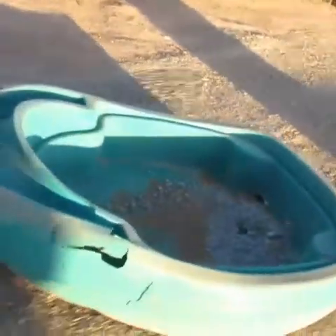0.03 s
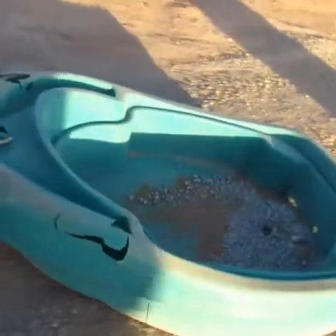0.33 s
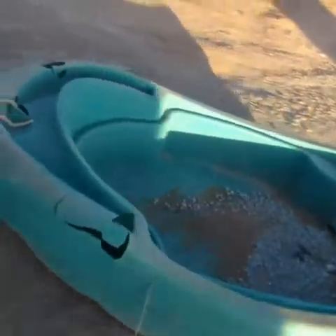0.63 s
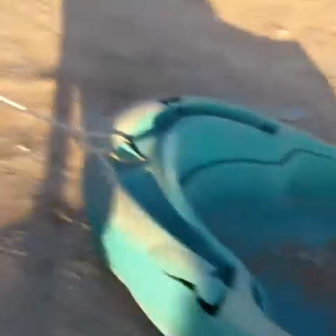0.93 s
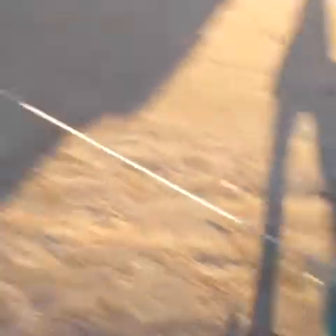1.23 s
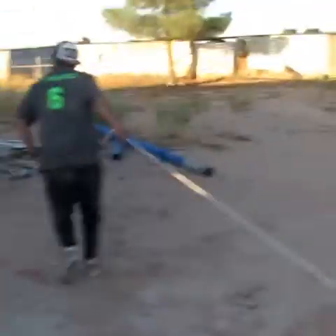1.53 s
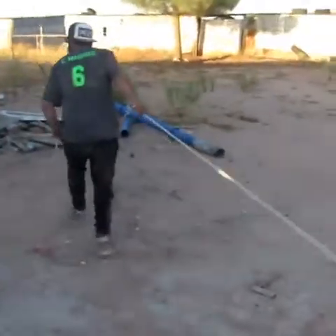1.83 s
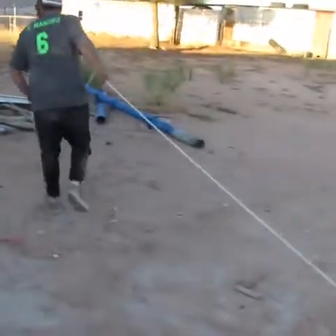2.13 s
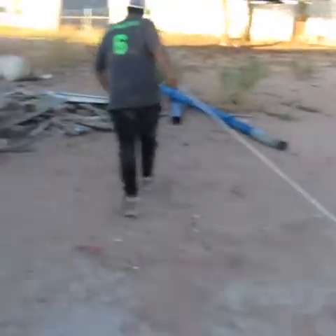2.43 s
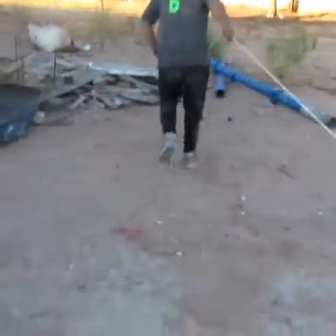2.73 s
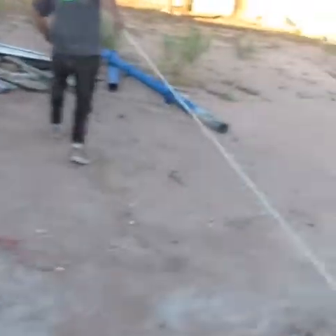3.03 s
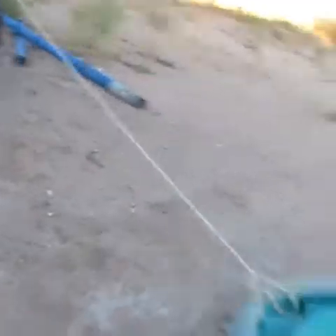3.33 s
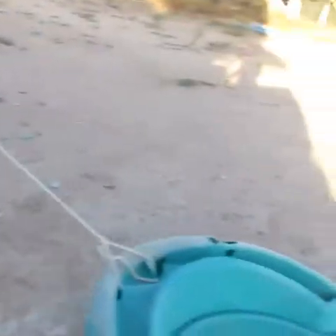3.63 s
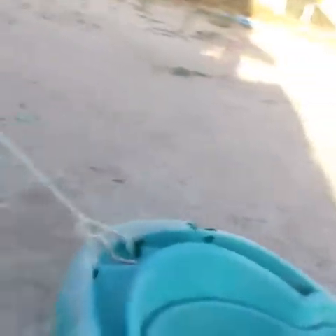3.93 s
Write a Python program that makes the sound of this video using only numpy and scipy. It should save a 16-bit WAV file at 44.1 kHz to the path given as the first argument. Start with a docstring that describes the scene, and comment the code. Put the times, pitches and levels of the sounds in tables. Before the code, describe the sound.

A plastic tub dragged over dirt, rumbling hollowly with gritty scraping and small thumps.

```python
"""Bare dirt, close to the microphone: a plastic tub with some gravel in it is dragged on a rope.
Grit catching under its floor makes the shell rumble and rasp; sand hisses at the rim, gravel crackles.
Now and then a stone ticks on the plastic, a pebble snaps or the tub thumps over a stone.
Light wind stirs at the microphone."""
import sys
import numpy as np
from scipy import signal
from scipy.fft import rfft, irfft
from scipy.io import wavfile
from scipy.ndimage import uniform_filter1d, minimum_filter1d

SR = 44100
rng = np.random.default_rng(int(sys.argv[2]) if len(sys.argv) > 2 else 0)


def pcm_store(signal):
    """Save signal as 16-bit PCM."""
    levels = np.round(np.clip(np.atleast_2d(signal), -1, 1) * 32767)
    wavfile.write(sys.argv[1], SR, levels.astype(np.int16).T)


N = 176400
TIME = np.arange(N) / SR
BIN_HZ = np.fft.rfftfreq(N, 1 / SR)


def amp(db):
    return 10 ** (np.asarray(db) / 20)


def unit_rms(x):
    return x / np.sqrt(np.mean(x ** 2) + 1e-20)


def unit_peak(x):
    return x / abs(x).max()


def highpass(x, hz):
    return signal.sosfilt(signal.butter(4, hz, "high", fs=SR, output="sos"), x)


def curve(points):
    """A (seconds, value) table at every sample."""
    return np.interp(TIME, *np.transpose(points))


def at_hz(points, hz):
    """A (Hz, value) table on a log-frequency axis."""
    points_hz, value = np.transpose(points)
    return np.interp(np.log(hz + 1), np.log(points_hz), value)


def add(mix, start_s, sound):
    part = mix[..., max(round(start_s * SR), 0):][..., :sound.shape[-1]]
    part += sound[..., :part.shape[-1]]


def ring(x, spectrum, size=4096):
    """Passes x through a causal body with the given spectrum."""
    log_gain = np.log(amp(at_hz(spectrum, abs(np.fft.fftfreq(size, 1 / SR)))))
    response = np.fft.ifft(np.exp(signal.hilbert(log_gain).conj())).real[:size // 2]
    return signal.fftconvolve(x, response)[:len(x)]


def decay(x, decay_s):
    """Gives each click an exponential tail."""
    return signal.lfilter([1], [1, -np.exp(-1 / (decay_s * SR))], x)


def wander(slow_hz, fast_hz):
    """Random drift of rms 1 between two rates."""
    shape = BIN_HZ / (BIN_HZ + slow_hz) ** 1.5 / (1 + (BIN_HZ / fast_hz) ** 2)
    return unit_rms(irfft(rfft(rng.standard_normal(N)) * shape, N))


def catches(per_s, spread_db):
    """Grains catching and slipping: random clicks of uneven size."""
    size = amp(spread_db * np.minimum(rng.exponential(1, N), 4))
    return size * rng.choice([-1, 1], N) * (rng.random(N) < per_s / SR)


def stereo(make, apart):
    """Two channels share one sound; apart is the power share each hears alone."""
    return np.sqrt(1 - apart) * make() + np.sqrt(apart) * np.array([make(), make()])


# Shell response. Each row: frequency in Hz, gain in dB.
SHELL_SPECTRUM = [(25, -63), (50, -38.5), (80, -9), (105, -7), (130, 1.5), (165, -2.5), (230, -1.5),
                  (320, -1.5), (390, -6.5), (500, -12.5), (610, -20.5), (690, -34.5), (1000, -47.5),
                  (3000, -82.5)]
# Floor panel modes. Each row: ratio to the main note, weight in dB, decay in seconds.
PANEL_MODES = [(.8, -10, 0.012), (1, 3, 0.011), (1.222, -7.5, 0.012), (1.7, -17.5, 0.02)]
# Rumble envelope. Each row: time in seconds, level in dB.
RUMBLE_DB = [(0, -20), (.25, -21), (.42, -21.5), (.5, -18), (.8, -21), (.95, -18.5), (1.3, -21),
             (1.43, -20.5), (1.56, -19), (1.71, -20), (1.75, -23), (1.92, -17.5), (1.96, -22), (2.06, -16),
             (2.18, -21), (2.31, -20.5), (2.42, -25), (2.47, -20), (2.61, -23), (2.77, -18), (2.95, -24.5),
             (3.02, -21), (3.11, -25.5), (3.28, -21), (3.4, -23.5), (3.48, -21), (3.8, -21.5),
             (3.89, -25.5), (3.94, -24)]


def rumble(panel_hz=270, panel_db=-7, flex=0.043):
    """Dirt lumps knock the floor: the damped shell booms, the panel's hollow notes bend as it flexes."""
    cycles = np.cumsum(panel_hz * (1 + flex * wander(slow_hz=1.6, fast_hz=12))) / SR
    drive = catches(per_s=900, spread_db=1.0)
    modes = 0
    for ratio, weight_db, decay_s in PANEL_MODES:
        phasor = np.exp(2j * np.pi * ratio * cycles)
        modes += amp(weight_db / 2) * (phasor * decay(drive / phasor, decay_s)).real
    hollow = amp(panel_db) * unit_rms(ring(modes, SHELL_SPECTRUM))
    knocks = lambda: unit_rms(ring(catches(per_s=1800, spread_db=1.6), SHELL_SPECTRUM))
    judder_db = 0.31 * wander(slow_hz=9.7, fast_hz=49.7)
    return (stereo(knocks, apart=0.046) + hollow) * amp(curve(RUMBLE_DB) + judder_db - 0.12)


# Gusts as the microphone swings round. Each row: time in seconds, relative level in dB.
GUST_DB = [(0, -32), (1.5, -41), (1.85, -26), (2.0, -35), (2.6, -30), (2.9, -45), (4, -37)]
# Light wind. Each row: frequency in Hz, gain in dB.
WIND_SPECTRUM = [(15, -28), (55, 11), (80, -11), (300, -26), (2000, -45)]


def wind(opposed=0.83):
    """Soft low buffeting pushes on one microphone port as it pulls on the other."""
    puff = lambda: unit_rms(ring(rng.standard_normal(N), WIND_SPECTRUM))
    pair = stereo(puff, apart=1 - opposed) * np.array([[1], [-1]])
    return pair * amp(curve(GUST_DB) + 1.6 * wander(slow_hz=6, fast_hz=18) - 9)


# Floor scrape as the pull comes and goes. Each row: time in seconds, level in dB.
DRAG_DB = [(.02, -34.5), (.07, -33.5), (.34, -32), (.78, -31), (1.0, -28.5), (1.06, -33), (1.09, -29),
           (1.22, -33.5), (1.44, -31), (1.63, -30), (1.66, -28.5), (1.71, -27), (1.73, -36), (1.86, -32),
           (1.98, -32.5), (2.23, -32), (2.28, -37.5), (2.68, -35.5), (2.76, -31.5), (2.92, -34),
           (2.98, -30), (3.03, -35), (3.5, -35.5), (3.73, -36), (3.82, -31), (3.92, -36)]
# Scraping floor. Each row: frequency in Hz, gain in dB.
FLOOR_SPECTRUM = [(200, -40), (600, -16.5), (690, -18), (790, -4.5), (900, 1), (1200, -2.5), (1600, -7),
                  (2400, -16.5), (3300, -28), (6000, -46), (15000, -47)]
# Envelope of rim grit, sand and gravel. Each row: time in seconds, relative level in dB.
GRAIN_DB = [(.02, -48), (.09, -50), (.27, -45), (.35, -50), (.48, -45), (.77, -49), (.99, -43.5),
            (1.06, -47.5), (1.1, -43), (1.15, -51), (1.23, -51.5), (1.37, -52), (1.41, -49), (1.6, -50.5),
            (1.7, -46), (1.73, -54.5), (1.92, -49.5), (1.98, -54.5), (2.23, -49.5), (2.29, -54),
            (2.66, -56), (2.77, -50.5), (2.87, -53), (3.1, -55), (3.4, -52.5), (3.55, -56), (3.67, -51.5),
            (3.74, -55.5), (3.83, -49), (3.92, -55)]
# Coarse grit at the rim. Each row: frequency in Hz, gain in dB.
RIM_SPECTRUM = [(700, -18), (1500, -3.5), (2500, 8.5), (3400, 1), (4500, -3), (8000, -23)]


def scrape(clumps):
    """Grit rasps along the floor in clumps; coarser grains grind at the rim."""
    rasp = lambda: unit_rms(ring(catches(per_s=3800, spread_db=1.0), FLOOR_SPECTRUM))
    grind = unit_rms(ring(catches(per_s=1900, spread_db=-0.5), RIM_SPECTRUM))
    floor = stereo(rasp, apart=0.042) * amp(curve(DRAG_DB) + 1.49 * clumps + 0.01)
    return floor + grind * amp(curve(GRAIN_DB) + 2.4 * clumps + 0.5)


# Loose sand. Each row: frequency in Hz, gain in dB.
SAND_SPECTRUM = [(500, -25), (2000, 6), (3500, -0.5), (5000, 0), (7500, -5), (10000, -9), (12500, -15.5),
                 (14500, -29)]


def sand(clumps, apart_hz=7000):
    """Fine grains hiss and crackle around the rim; the finest differ from port to port."""
    fizz = lambda: unit_rms(ring(catches(per_s=12000, spread_db=2.0), SAND_SPECTRUM))
    apart = 0.69 * BIN_HZ ** 2 / (BIN_HZ ** 2 + apart_hz ** 2)
    shared = np.sqrt(1 - apart) * rfft(fizz())
    separate = np.sqrt(apart) * rfft([fizz(), fizz()])
    return irfft(shared + separate, N) * amp(curve(GRAIN_DB) + 1.2 * clumps + 2.5)


# Crunching gravel. Each row: frequency in Hz, gain in dB.
GRAVEL_SPECTRUM = [(700, -23), (1800, 1), (2700, 13.5), (5000, 1), (8000, -11), (13000, -28)]


def gravel(crush_s=0.0023, offset_db=-4.0, expansion=0.65):
    """Gravel grinds and cracks in short, dry bursts, standing out most while the tub is close."""
    bursts = decay(abs(catches(per_s=130, spread_db=1.0)), crush_s)
    crackle = lambda: unit_rms(ring(bursts * rng.standard_normal(N), GRAVEL_SPECTRUM))
    grain_db = curve(GRAIN_DB)
    level_db = grain_db + expansion * (grain_db - grain_db.mean()) + offset_db
    return stereo(crackle, apart=0.04) * amp(level_db)


# Larger stones on the plastic. Each row: start in seconds, peak level in dB, resonance in Hz.
STONE_TICKS = [(.088, -16, 980), (.131, -24.5, 3200), (.283, -20, 2000), (1.399, -19.5, 1720),
               (2.238, -17, 1150), (2.621, -23.5, 1050), (3.512, -20.5, 1150), (3.551, -18.5, 1480),
               (3.784, -19.5, 960)]


def ticks(low_cut_hz=800, decay_cycles=4, rasp_s=0.004, size=2048):
    """A stone knocks on the plastic: a dry rasp with one broad, dead resonance."""
    out, t = np.zeros(N), np.arange(size) / SR
    for start_s, db, hz in STONE_TICKS:
        note = np.sin(2 * np.pi * hz * t) * np.exp(-t * hz / decay_cycles) * np.tanh(t * hz)
        rasp = ring(rng.standard_normal(size) * np.exp(-t / rasp_s), FLOOR_SPECTRUM)
        tick = highpass(unit_peak(note) + unit_peak(rasp), low_cut_hz)
        add(out, start_s, amp(db) * unit_peak(tick))
    return out


# Pebbles under the rim. Each row: start in seconds, peak level in dB.
PEBBLE_SNAPS = [(.089, -30), (.132, -28), (.1935, -30), (.2583, -33), (.283, -24.5), (0.496, -35),
                (0.505, -25), (.931, -31), (0.978, -32), (.984, -26.5), (1.087, -22), (1.098, -32)]


def pebbles(snap_s=0.0029, crumble_s=0.009, crumble_db=-12, size=2048):
    """A pebble snaps out from under the rim and scatters sand."""
    out, t = np.zeros((2, N)), np.arange(size) / SR
    envelope = np.exp(-t / snap_s) + amp(crumble_db) * np.exp(-t / crumble_s)
    snap = lambda: ring(rng.standard_normal(size) * envelope, SAND_SPECTRUM)
    for start_s, db in PEBBLE_SNAPS:
        add(out, start_s, amp(db) * unit_peak(stereo(snap, apart=0.056)))
    return out


# Thumps over stones. Each row: start in seconds, level in dB, panel note in Hz.
STONE_BUMPS = [(.190, -8.5, 249), (0.2806, -5, 200), (0.371, -11.5, 289), (.649, -8.5, 173),
               (0.725, -9, 311), (0.84, -7.5, 291), (0.919, -7.5, 268.6), (0.986, -10.5, 272),
               (1.087, -9, 214), (1.498, -13.5, 273), (1.682, -9.5, 180), (2.237, -4, 263.6),
               (2.452, -13.5, 333), (2.489, -10, 226), (2.82, -14.5, 279), (2.984, -7.5, 234.5),
               (2.993, -17.5, 309), (3.002, -9.5, 222), (3.624, -12.5, 245)]


def bumps(attack_s=0.0015, crunch_db=-21, crunch_s=0.0094, push_db=-9, size=4096):
    """A stone pushes the shell, grinds briefly and swings the panel; where it presses sets the note."""
    out, t = np.zeros(N), np.arange(size) / SR
    push = amp(push_db) * unit_peak(ring(signal.unit_impulse(size), SHELL_SPECTRUM))
    for start_s, db, hz in STONE_BUMPS:
        swing = sum(amp(weight_db) * np.sin(2 * np.pi * ratio * hz * t) * np.exp(-t / decay_s)
                    for ratio, weight_db, decay_s in PANEL_MODES)
        swing *= 1 - np.exp(-t / attack_s)
        thump = unit_peak(highpass(swing, hz / 2)) + push
        crunch = ring(rng.standard_normal(size) * np.exp(-t / crunch_s), FLOOR_SPECTRUM)
        add(out, start_s, amp(db) * (amp(crunch_db) * unit_peak(crunch) - unit_peak(thump)))
    return out


# Microphone port balance. Each row: frequency in Hz, left minus right in dB.
BALANCE_DB = [(40, -2), (110, -12), (280, -10), (450, -7.5), (650, -6), (1000, -3.5), (1600, -2),
              (4000, -1), (14000, -1.5)]
# Microphone port phase. Each row: frequency in Hz, left lead in radians.
LEAD_RAD = [(30, 0.17), (180, 0.51), (430, 0.41), (950, 0.5), (1500, 0.22), (3000, 0.13), (6000, -0.26),
            (14000, -0.5)]


def ports(x):
    """Sound reaches the right port louder and, below the high treble, the left a little earlier."""
    left = amp(at_hz(BALANCE_DB, BIN_HZ) / 2) * np.exp(0.5j * at_hz(LEAD_RAD, BIN_HZ))
    pair = np.array([left, 1 / left])
    return irfft(rfft(x) * pair / abs(pair.mean(0)), N)


def scene():
    """The dragged tub and the wind."""
    clumps = wander(slow_hz=2.3, fast_hz=69.4)
    tub = rumble() + scrape(clumps) + sand(clumps) + gravel() + bumps() + pebbles() + ticks()
    return ports(tub) + wind()


def record(dry, ceiling=0.95, window_samples=400, cutoff_hz=14500):
    """Gentle peak limiter, then a low-pass."""
    gain = np.minimum(1, ceiling / (abs(dry).max(0) + 1e-9))
    limited = dry * uniform_filter1d(minimum_filter1d(gain, window_samples), window_samples)
    lowpass = signal.firwin(511, cutoff_hz, window=("kaiser", 9), fs=SR)
    return signal.oaconvolve(limited, lowpass[None], "same")


dry = scene()
out = record(dry)
pcm_store(out)
```